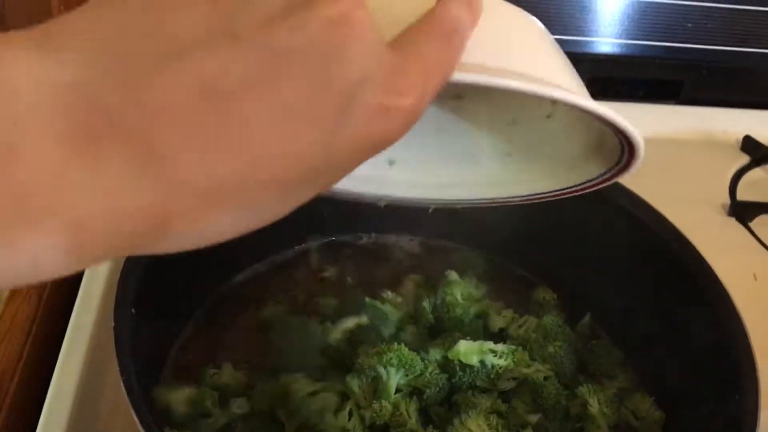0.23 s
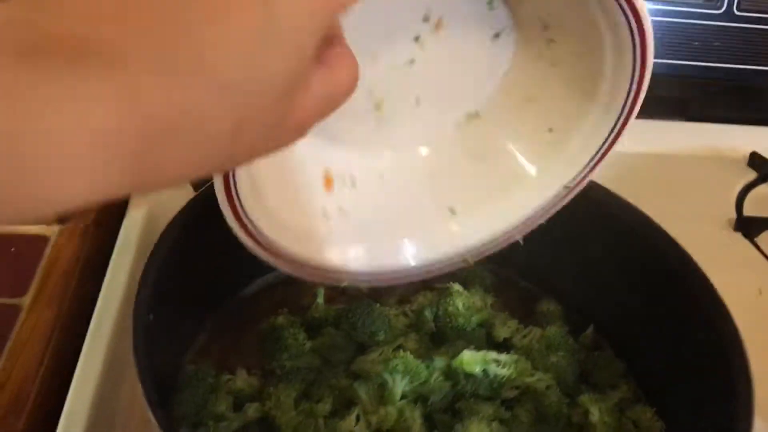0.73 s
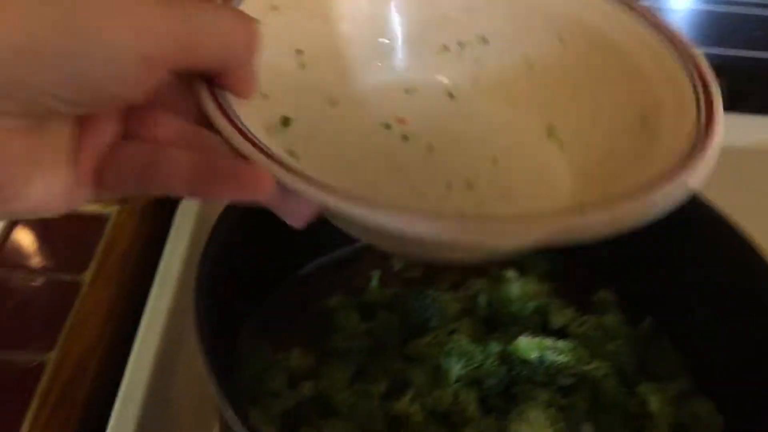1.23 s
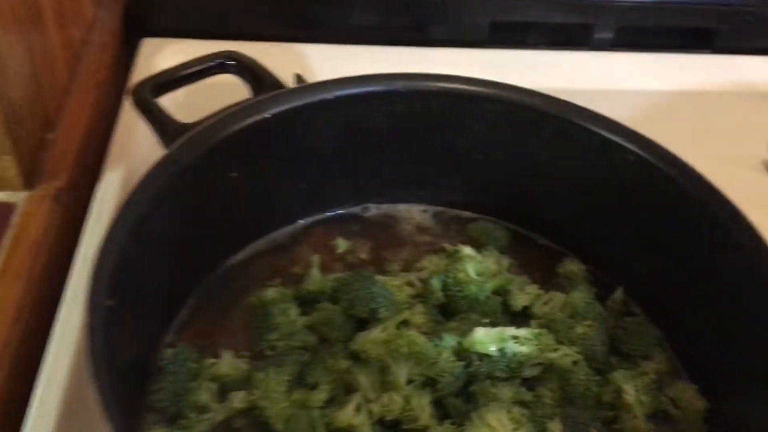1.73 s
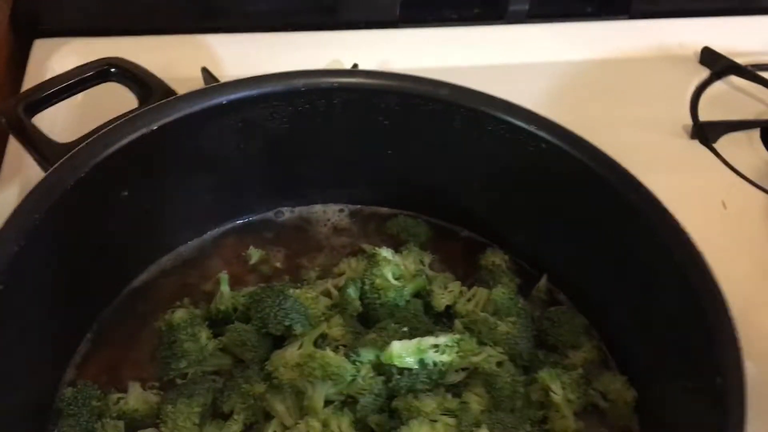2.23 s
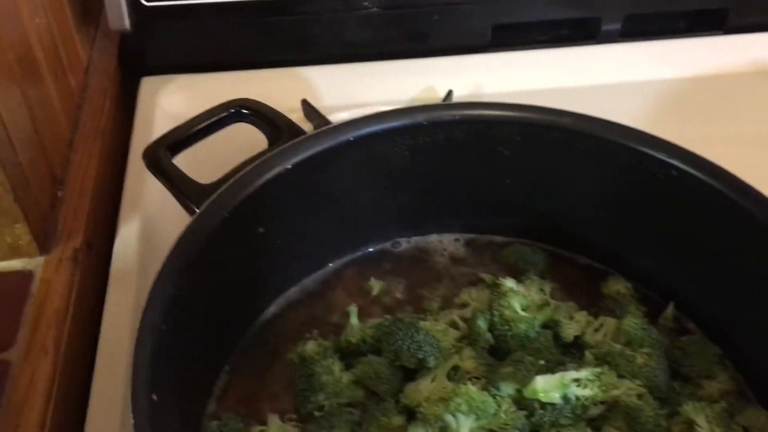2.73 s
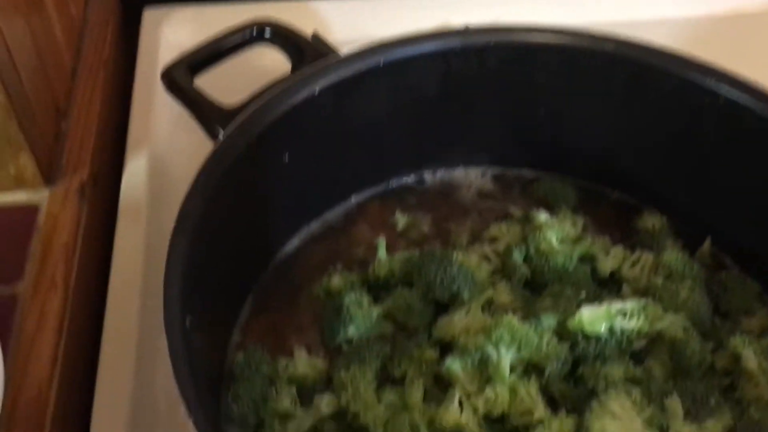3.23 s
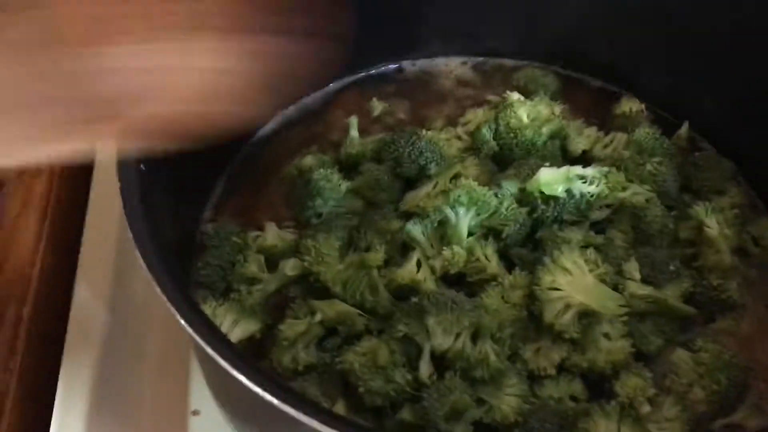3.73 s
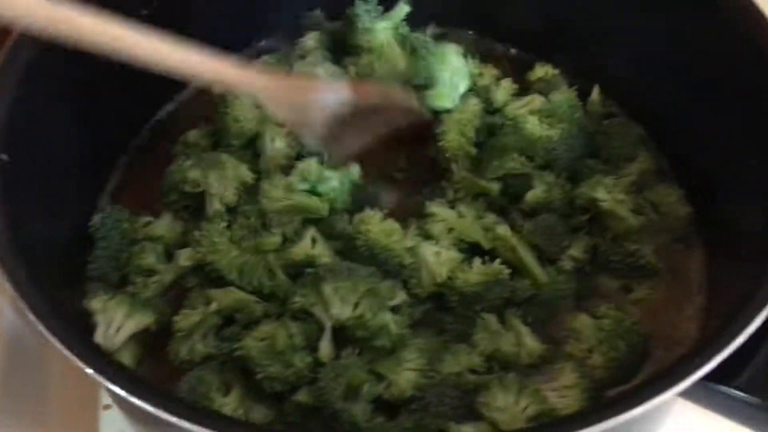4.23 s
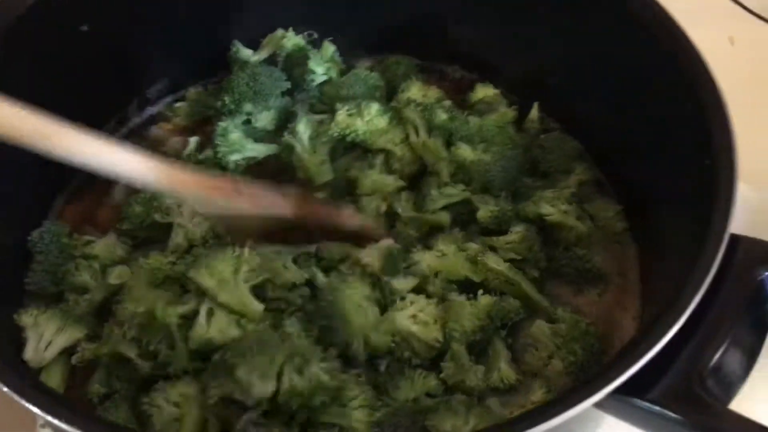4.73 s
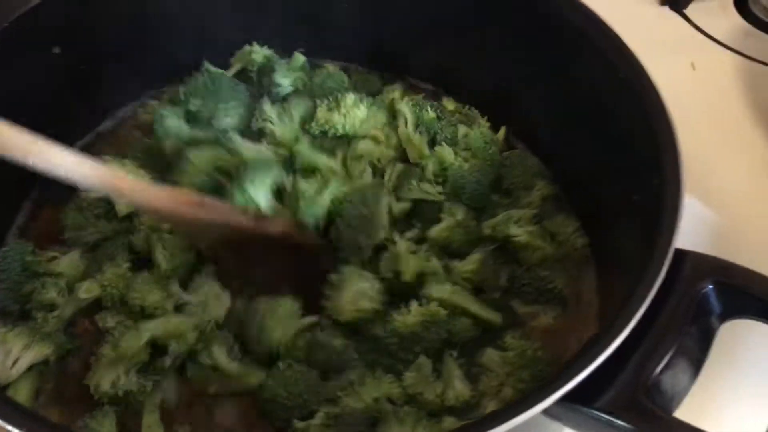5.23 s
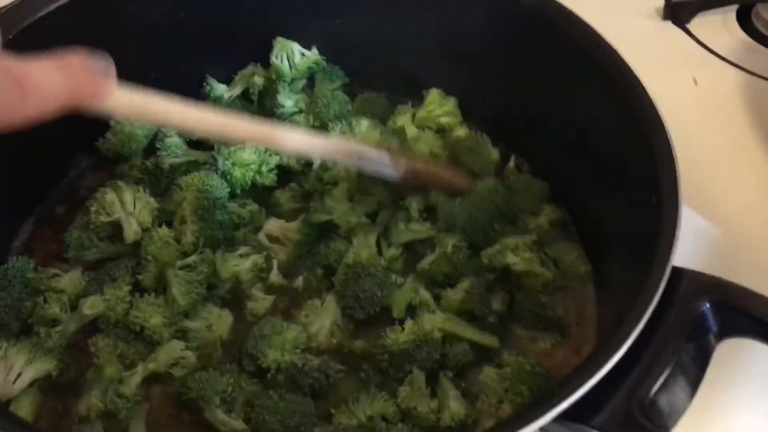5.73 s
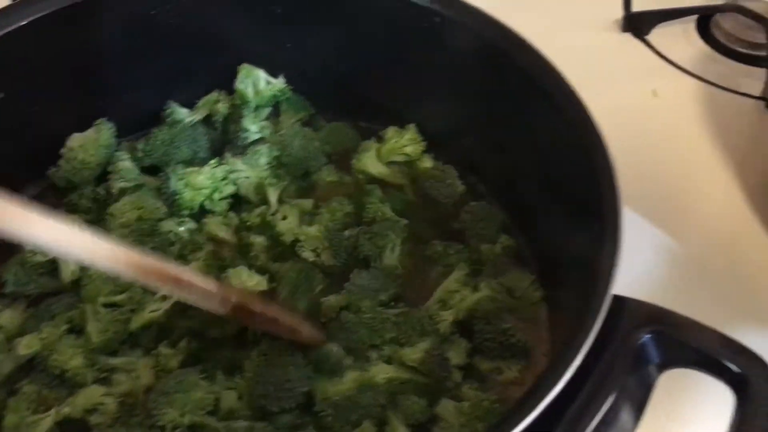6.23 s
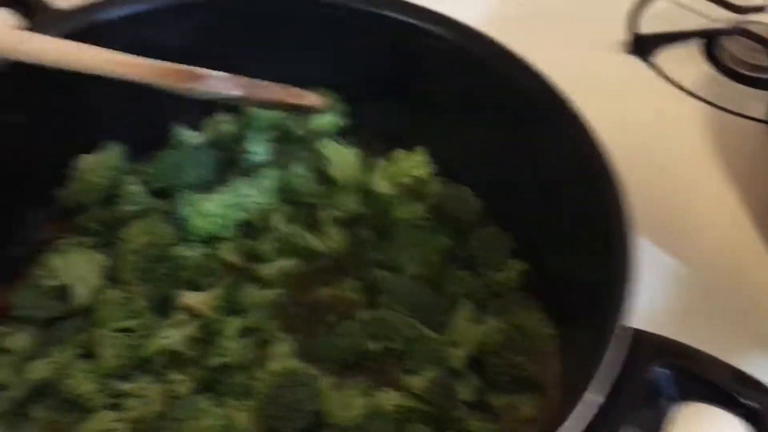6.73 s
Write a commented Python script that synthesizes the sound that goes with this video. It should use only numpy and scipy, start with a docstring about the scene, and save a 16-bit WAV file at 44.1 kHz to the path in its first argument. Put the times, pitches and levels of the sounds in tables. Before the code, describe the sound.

Close to a stove, wet vegetables settle in broth with a light, fading fizz over low appliance hum. After two seconds a heavy bowl bangs onto a counter, hard and bright, and rattles again before resting. A spoon knocks softly, then stirs in repeated strokes: moist crackling, small snaps, bubble pops and a low liquid wash. The indoor room answers briefly; the stirring is far quieter than the bowl.

```python
"""The last florets slide with a wet crackle from a ceramic bowl into a simmering soup pot, in a humming kitchen.
The bowl is set down hard nearby: it knocks, bounces and rattles to rest, as decaying modes and noise bursts.
A wooden spoon is picked up and stirs the florets: clouds of tiny damped sines crackle and squelch,
rising tones plop, short noise bursts snap, and low noise washes with each stroke."""
import sys
import numpy as np
from scipy import signal
from scipy.fft import rfft, irfft, next_fast_len
from scipy.io import wavfile
from scipy.ndimage import map_coordinates

SR = 44100
rng = np.random.default_rng(int(sys.argv[2]) if len(sys.argv) > 2 else 0)


def to_wav(sig):
    """Store sig (one row per channel, or 1-D mono) as 16-bit WAV at the path in sys.argv[1].

    Samples outside -1..1 are clipped; the rate is SR.
    """
    pcm = np.clip(np.atleast_2d(sig), -1, 1) * 32767
    pcm = np.round(pcm).astype(np.int16)
    wavfile.write(sys.argv[1], SR, pcm.T)  # frames by channels


N = 308259
TIME = np.arange(N) / SR  # s
RING_TIME = TIME[:SR // 2]  # the time axis of one blow, s

# Spectrum of the quiet kitchen air. Each row: frequency in Hz, relative level in dB per Hz.
AIR_SPECTRUM = [(13, -54), (22, -20.5), (49, -3.5), (72, 2), (91, -11), (123, 2), (148, -12.5), (234, -5),
                (434, -15.5), (470, -15.5), (615, -17.5), (997, -19.5), (2690, -29.5), (6200, -37),
                (13500, -40.5)]
# Hum of motors and mains. Each row: frequency in Hz, mean level in dB.
HUM_TONES = [(64, -74.5), (120, -74.5), (238, -77.5), (355, -77.5), (472, -84), (531, -85)]
# Reverberation of the room. Each row: frequency in Hz, t60 in s.
ROOM_DECAY = [(200, 0.63), (600, 0.27), (1400, 0.41), (4000, 0.41), (7000, 0.31), (13000, 0.28),
              (14500, 0.22)]

# Spectrum of the moving broth. Each row: frequency in Hz, relative level in dB per Hz.
BROTH_SPECTRUM = [(25, -1), (55, -3.5), (110, 5), (280, 7), (550, -6), (1100, -20), (2200, -15.5),
                  (4000, -24)]
# Spectrum of the wet crackle. Each row: frequency in Hz, relative level in dB per Hz.
WET_SPECTRUM = [(600, -10.5), (1100, 7.5), (1600, -13), (2200, -4), (4000, 1.5), (8000, 11.5), (10500, 8.5),
                (13500, 2)]
# Strokes of the spoon through the pot. Each row: start in seconds, length in s, wet crackle in dB,
# moving broth in dB.
STROKES = [(3.96, 0.3, -63.5, -58.5), (4.483, .37, -65, -57), (5.05, 0.51, -66, -67.5),
           (5.765, 0.3, -64.5, -63.5), (6.313, 0.4, -69.5, -61.5), (6.86, 0.25, -66, -67)]
STROKE_RISE_S = 0.018  # time constant as the florets start to move
SETTLE_T60_S = 1.66  # they settle again after the spoon stops
SURGE_SHARE = 0.57  # time constant of the broth's surge, as a share of the stroke's length
POUR_DB, POUR_T60_S = -67, 3.6  # the crackle of the freshly tipped florets dies away
POUR_WASH_DB, POUR_WASH_T60_S = -65, 2.7  # and so does the wave they raise in the broth
REST_DB = -83  # crackle of the florets lying in the hot broth

# Florets land or are pushed through the broth. Each row: start in seconds, level in dB, length in s,
# centre of the band in Hz.
SQUELCHES = [(0, -66.5, 0.06, 6540), (0.124, -63, .025, 7400), (0.237, -57.5, 0.0085, 8050),
             (3.975, -62, 0.022, 1200), (4.086, -53, 0.044, 2900), (4.104, -58, .09, 5640),
             (4.678, -56, 0.048, 2160), (4.822, -56, 0.039, 1700), (4.898, -66, .11, 1390),
             (5.105, -68, .15, 2600), (5.842, -64, 0.16, 2320), (6.579, -62, 0.04, 1420),
             (6.981, -57.5, .03, 3520)]
# Wet films snap between the florets. Each row: start in seconds, level in dB, centre in Hz.
SNAPS = [(4.872, -51, 2000), (5.3145, -48.5, 5800), (5.3375, -49, 5800), (5.464, -47.5, 3800),
         (5.518, -49, 4600), (5.5365, -44.5, 7900), (6.21, -53, 3700), (6.3312, -41, 2850),
         (6.7767, -52, 3600), (6.9118, -44.5, 3650)]
# Bubbles and pockets of air that pop. Each row: start in seconds, level in dB, initial pitch in Hz, t60 in s.
PLOPS = [(2.630, -39.5, 947, 0.032), (3.129, -49.5, 2170, 0.011), (4.900, -46, 980, 0.018),
         (4.994, -48.5, 2300, 0.011), (5.003, -46, 1070, 0.017), (5.055, -51, 570, 0.022),
         (5.374, -57, 1880, 0.018), (6.44, -52, 1940, 0.022), (6.4875, -37, 565, 0.022),
         (6.494, -51.5, 258, 0.22)]
# Soft swishes as the spoon is brought over the pot. Each row: peak in seconds, level in dB, half width in s.
SWISHES = [(3.65, -71, 0.055), (3.774, -62.5, 0.019)]
# The bowl is rubbed, by the sliding florets and then by the worktop. Each row: start in seconds,
# length in s, level in dB.
RUBS = [(0, 0.17, -77), (2.862, .05, -70)]
# Resonances of the rubbed bowl. Each row: frequency in Hz, relative level in dB.
RUB_MODES = [(3615, -3), (5600, -4.5), (8060, -4)]
# The spoon ticks against the pot. Each row: start in seconds, level in dB.
TICKS = [(4.427, -55.5), (4.4588, -48.5), (4.4622, -44), (5.589, -44)]
# Modes of the full pot. Each row: frequency in Hz, relative level in dB, t60 in s.
POT_MODES = [(2470, -11, 0.073), (3400, -19, 0.11), (4320, -5, 0.016), (6060, -13.5, 0.046),
             (6440, -2.5, 0.015)]
# Dull knocks of bowl and spoon being handled. Each row: start in seconds, knock in dB, centre in Hz,
# click in dB, boom in dB, t60 of knock and click in s.
KNOCKS = [(1.4525, -49, 830, -59.5, -60, 0.097), (3.2008, -56, 910, -44.5, -45, 0.016),
          (3.203, -38.5, 750, -59.5, -43.5, 0.044), (3.214, -57.5, 600, -62, -47, 0.1),
          (3.4042, -42.5, 950, -72, -49, 0.028), (3.4206, -60.5, 1200, -57, -70, 0.025),
          (4.689, -55, 414, -72, -50.5, 0.05), (5.575, -52, 526, -57.5, -51.5, 0.15),
          (5.635, -58, 474, -80, -60, .15), (6.674, -61, 600, -62, -55, 0.052)]

# The bowl meets the worktop. Each row: start in seconds, knock in dB, ceramic ring in dB, crack in dB,
# knock tilt in dB per octave, how far it is seated on its foot from 0 to 1.
BOWL_CONTACTS = [(2.4001, -15.5, -15.5, -25.5, 11, 0.11), (2.4029, -19, -31.5, -31, 2, 0.8),
                 (2.4314, -21, -28, -36.5, 3, 0.03), (2.4518, -26, -59, -52.5, 6.5, 0.5),
                 (2.6704, -21.5, -35, -38.5, -1.5, 0.6), (2.7181, -31.5, -35, -30, 8.5, 1),
                 (2.7223, -19.5, -28.5, -28, -1, 0.7), (2.7345, -16.5, -25, -31.5, -1.5, 1),
                 (2.7476, -18, -31.5, -28, -6.5, 0.7), (2.768, -28.5, -49, -42, 7, 1)]
# Modes of worktop and bowl together. Each row: frequency in Hz, relative level in dB, t60 in s.
WORKTOP_MODES = [(429, -3, .075), (513, -9, .06), (725, -6, .05), (888, -2, .06), (963, -2, .06),
                 (1118, -3, .055), (1188, -4, .055), (1362, 0, .06), (1402, -2, .06), (1525, 0, .05),
                 (1620, -2, .05), (1820, -3, .05), (1990, -2, .045), (2240, -6, .045)]
# Modes of the ceramic wall, off its foot. Each row: frequency in Hz, relative level in dB, t60 in s.
CERAMIC_MODES = [(2720, -21, .08), (3600, -19, .07), (3860, -16, .05), (4080, -11, .14), (4135, -8, .07),
                 (4190, -12, .08), (6436, 0, .055), (7635, -21, .06), (8130, -13, .07), (9008, -24, .09),
                 (10095, -22, .09), (10385, -29, .1), (12700, -31, .05), (13000, -32, .05)]
# Noise of the bowl's thud. Each row: frequency in Hz, relative level in dB per Hz.
THUD_SPECTRUM = [(60, -23), (200, -19), (400, -7.5), (900, 7), (1900, 3), (2900, -14), (5000, -37),
                 (9000, -48.5), (14000, -64)]
# Noise of a sharp contact. Each row: frequency in Hz, relative level in dB per Hz.
CRACK_SPECTRUM = [(300, -14.5), (1500, -1), (4300, 5), (5400, -5), (8100, -1.5), (9400, -9.5),
                  (10200, -15.5), (11600, -17), (13100, -16), (14300, -20.5)]

QUIET_TOP_HZ = 13650  # upper limit of all sounds but the bowl's blows
TOP_HZ = 15200  # upper limit of the whole


def amp(db):
    """The decibel law: twenty decibels are a tenfold amplitude."""
    return 10 ** (np.asarray(db) / 20)


def unit(x):
    """Normalization of power: scale to rms 1."""
    return x / np.sqrt(np.mean(x ** 2) + 1e-20)


def along(points, hz):
    """Interpolation on a logarithmic frequency axis through (Hz, value) points."""
    point_hz, values = np.transpose(points)
    return np.interp(np.log(hz + 1), np.log(point_hz), values)


def wobble(rate):
    """Slow fluctuation: a smooth curve through random knots, rate of them a second."""
    knots = rng.standard_normal(int(N * rate / SR) + 4)
    return map_coordinates(knots, [TIME * rate])


def since(s):
    """Elapsed time in seconds from time s, zero before it."""
    return np.maximum(TIME - s, 0)


def dying(s, t60):
    """Exponential decay: a gain of 1 that falls by 60 dB in t60 from time s on."""
    return np.exp(-np.log(1000) * since(s) / t60)


def filtered(x, gain):
    """Linear filtering: x times a gain that depends on frequency."""
    size = next_fast_len(len(x) + 8192)
    hz = np.fft.rfftfreq(size, 1 / SR)
    return irfft(rfft(x, size) * gain(hz), size)[:len(x)]


def coloured(x, spectrum):
    """Spectral shaping: x under a (Hz, dB) spectrum, at rms 1."""
    return unit(filtered(x, lambda hz: amp(along(spectrum, hz))))


def hump(x, centre_hz, octaves):
    """Band-pass: x through one smooth band, Gaussian in octaves, at rms 1."""
    return unit(filtered(x, lambda hz: np.exp(-.5 * (np.log2((hz + 1) / centre_hz) / octaves) ** 2)))


def hiss():
    """White noise, equal power at all frequencies, for half a second."""
    return rng.standard_normal(len(RING_TIME))


def fade(t60, attack):
    """Transient response: a quick rise, then exponential decay, as after a blow."""
    return np.exp(-np.log(1000) * RING_TIME / t60) * (1 - np.exp(-RING_TIME / attack))


def burst(noise, t60, attack):
    """Impact noise under the envelope of a blow, with the energy of that envelope."""
    envelope = fade(t60, attack)
    return unit(noise * envelope) * np.sqrt(np.mean(envelope ** 2))


def ring(modes, attack, tilt_db=0):
    """Modal superposition: decaying sines, with new strengths for each point of contact."""
    hz, db, t60 = np.transpose(modes)
    tilt = tilt_db * np.log2(hz / np.median(hz))
    strength = amp(db + rng.standard_normal(len(hz)) + tilt)
    phase = rng.random((len(hz), 1))  # turns
    waves = np.sin(2 * np.pi * (hz[:, None] * RING_TIME + phase))
    return strength @ (waves * fade(t60[:, None], attack)) / np.linalg.norm(amp(db))


def add(track, s, sound):
    """Superposition: mix a sound into a track at time s."""
    part = track[round(s * SR):][:len(sound)]
    part += sound[:len(part)]


def in_kitchen(x, room_db, build_up_s=0.0072):
    """Reverberation: the walls' answer builds up, then dies at its own speed in each band."""
    hz, t, bands = signal.stft(hiss(), SR, nperseg=256)
    decay = np.exp(-np.log(1000) * t / along(ROOM_DECAY, hz)[:, None])
    tail = signal.istft(bands * decay, SR, nperseg=256)[1][:len(RING_TIME)]
    tail = tail * (1 - np.exp(-(RING_TIME / build_up_s) ** 2))
    return x + amp(room_db) * signal.fftconvolve(x, tail / np.linalg.norm(tail))[:len(x)]


def in_pot(x):
    """Multiple reflection: the steep walls throw each small sound to and fro, which colours it."""
    walls = fade(t60=.04, attack=.001) * hiss()
    return x + amp(-10) * signal.fftconvolve(x, walls / np.linalg.norm(walls))[:len(x)]


def grains(count, centre_hz, spread, cycles, size_db):
    """Granular noise of tiny bursting films of broth: damped sines at random, a few much larger than the rest."""
    when, rank = rng.random((count, 2)).T
    hz = centre_hz * np.exp(spread * rng.standard_normal((count, 1)))
    hz = np.clip(hz, 300, SR / 3)
    steps = np.arange(200)  # samples in a grain
    turns = hz * steps / SR
    size = amp(-size_db * np.log(rank + .01))[:, None]
    waves = size * np.sin(2 * np.pi * turns) * np.exp(-turns / cycles)
    places = (when * N).astype(int)[:, None] + steps
    return unit(np.bincount(places.ravel(), waves.ravel(), N)[:N])


def background():
    """Stationary sources: a faint simmer of grains, appliance hum of wavering sines, room air of shaped noise."""
    simmer = amp(-86) * grains(count=260, centre_hz=7500, spread=.3, cycles=1.5, size_db=2.5)
    hum = np.zeros(N)
    for hz, db in HUM_TONES:
        tone = np.sqrt(2) * np.sin(2 * np.pi * hz * TIME + .5 * wobble(1.4))
        hum += amp(db + wobble(8.8)) * tone
    air = amp(-62.0 + 0.58 * wobble(4)) * coloured(rng.standard_normal(N), AIR_SPECTRUM)
    return simmer + hum + air


def motion():
    """Addition of powers: the pour dies away, florets move and settle at each stroke, broth surges at mid-stroke."""
    florets = amp(REST_DB) ** 2 + (amp(POUR_DB) * dying(0, POUR_T60_S)) ** 2
    broth = (amp(POUR_WASH_DB) * dying(0, POUR_WASH_T60_S)) ** 2
    for s, length, crackle_db, broth_db in STROKES:
        push = (1 - np.exp(-since(s) / STROKE_RISE_S)) * dying(s + length, SETTLE_T60_S)
        surge = np.exp(-np.abs(TIME - s - length / 2) / (SURGE_SHARE * length)) * (TIME > s)
        florets = florets + (amp(crackle_db) * push) ** 2
        broth = broth + (amp(broth_db) * surge) ** 2
    return np.sqrt(florets), np.sqrt(broth)


def stirring():
    """Bubble noise: moving wet florets crackle, trap air and froth, over the low wash of the broth."""
    fine = coloured(grains(count=6500, centre_hz=4200, spread=.8, cycles=.7, size_db=3.8), WET_SPECTRUM)
    pops = grains(count=900, centre_hz=7000, spread=.45, cycles=1.5, size_db=3.6)
    pockets = grains(count=1100, centre_hz=1900, spread=.4, cycles=2.5, size_db=3)
    fizz = grains(count=5000, centre_hz=12000, spread=.15, cycles=1.5, size_db=3)
    mush = hump(grains(count=9000, centre_hz=2500, spread=.6, cycles=1, size_db=3), 2500, octaves=.6)
    clumps = amp(wobble(35))  # florets catch and let go in clumps
    florets, broth = motion()
    crackle = florets * clumps * (amp(-5.5) * fine + amp(-13) * pops + amp(-12.0) * pockets)
    froth = florets * amp(.8 * wobble(20)) * (amp(-13.5) * fizz + amp(-13) * mush)
    wash = broth * amp(wobble(14)) * coloured(rng.standard_normal(N), BROTH_SPECTRUM)
    return in_kitchen(in_pot(crackle + froth), room_db=-7.0) + wash


def squelches():
    """Flow through narrow gaps: a push squeezes a rush of small bursts from between the florets."""
    out = np.zeros(N)
    froth = grains(count=16000, centre_hz=3360, spread=1.0, cycles=0.25, size_db=2.2)
    for s, db, length, hz in SQUELCHES:
        age = since(s) / (length / 4)  # the rush peaks at age 1
        out += amp(db) * age * np.exp(1 - age) * hump(froth, hz, octaves=1.08)
    return in_kitchen(out, room_db=-11)


def snaps():
    """Rupture of a liquid film: each break is one short tick of narrow-band noise."""
    out = np.zeros(N)
    for s, db, hz in SNAPS:
        tick = burst(hump(hiss(), hz, octaves=0.25), t60=0.0087, attack=0.001)
        add(out, s, amp(db) * tick)
    return in_kitchen(out, room_db=-10.0)


def plops():
    """Bubble resonance: the pitch rises as the bubble nears the surface, and a small splash joins it."""
    out = np.zeros(N)
    for s, db, hz, t60 in PLOPS:
        pitch = hz * (1 + 0.1 * np.minimum(RING_TIME / t60, 1))
        note = np.sin(2 * np.pi * np.cumsum(pitch) / SR) * fade(t60, attack=0.42 / hz)
        splash = burst(hump(hiss(), hz, octaves=0.39), t60, attack=0.00093)
        add(out, s, amp(db) * (note + amp(-5.5) * splash))
    return in_kitchen(out, room_db=-9.0)


def swishes():
    """Brushing noise: a light band of noise swells and fades as the arm reaches over."""
    swell = sum(amp(db) * np.exp(-.5 * ((TIME - s) / width) ** 2) for s, db, width in SWISHES)
    brushing = hump(rng.standard_normal(N), 5600, octaves=0.55)
    return in_kitchen(swell * brushing, room_db=-14.5)


def rubs():
    """Friction excitation: sliding feeds a few narrow resonances, so the bowl sings faintly."""
    feed = np.zeros(N)
    for s, length, db in RUBS:
        feed += amp(db) * (1 - np.exp(-since(s) / .01)) * dying(s + length, t60=0.24)
    song = sum(amp(db) * hump(rng.standard_normal(N), hz, octaves=.012) for hz, db in RUB_MODES)
    return feed * unit(song)


def pot_ticks():
    """Damped modes: the spoon touches the wall of the full pot, which rings only briefly."""
    out = np.zeros(N)
    for s, db in TICKS:
        scratch = burst(hump(hiss(), 6100, octaves=0.64), t60=0.0071, attack=0.00018)
        add(out, s, amp(db) * (ring(POT_MODES, attack=0.00025) + amp(-1.0) * scratch))
    return in_kitchen(out, room_db=-11)


def knocks():
    """Soft impact: a click, a damped knock and the low boom of what lies under it."""
    out = np.zeros(N)
    for s, db, hz, click_db, boom_db, t60 in KNOCKS:
        thump = burst(hump(hiss(), hz, octaves=0.76), t60, attack=0.00058)
        click = burst(coloured(hiss(), CRACK_SPECTRUM), t60, attack=0.00034)
        boom = burst(hump(hiss(), 237, octaves=0.86), 1.33 * t60, attack=0.0018)
        contact = amp(db) * thump + amp(click_db) * click + amp(boom_db) * boom
        add(out, s, in_kitchen(contact, room_db=-7.5))
    return out


def bowl():
    """Hard impact: each contact cracks, knocks the worktop and excites the modes of the ceramic."""
    out = np.zeros(N)
    hz, db, t60 = np.transpose(CERAMIC_MODES)
    for s, knock_db, ring_db, crack_db, tilt_db, seated in BOWL_CONTACTS:
        thud = burst(coloured(hiss(), THUD_SPECTRUM), t60=0.054, attack=0.0017)
        boom = burst(hump(hiss(), 210, octaves=.7), t60=0.082, attack=0.0038)  # the cupboard under the worktop
        knock = ring(WORKTOP_MODES, attack=0.001, tilt_db=tilt_db) + amp(0.5) * thud + amp(-27.5) * boom
        crack = burst(coloured(hiss(), CRACK_SPECTRUM), t60=.025, attack=0.0003)
        blow = amp(knock_db) * knock + amp(crack_db) * crack
        add(out, s, in_kitchen(blow, room_db=-10.5, build_up_s=0.004))
        # on its foot the bowl is stiffer and more damped, and the hard foot stirs the high modes
        modes = np.transpose([hz + 120 * seated, db, t60 / (1 + 1.2 * seated)])
        wall = ring(modes, attack=0.0006, tilt_db=7.2 * seated)
        add(out, s, in_kitchen(amp(ring_db) * wall, room_db=-10.5, build_up_s=.005))
    return out


def scene():
    """Superposition of sources: the quiet sounds are cut at a lower limit than the hard blows of the bowl."""
    quiet = background() + stirring() + squelches() + snaps() + plops()
    quiet = quiet + swishes() + rubs() + pot_ticks() + knocks()
    return (filtered(quiet, lambda hz: hz < QUIET_TOP_HZ) + bowl())[None]


def record(dry):
    """Band limitation: the microphone keeps almost nothing above its limit, by a steep low-pass."""
    low_pass = signal.ellip(10, .1, 90, TOP_HZ, fs=SR, output="sos")
    return signal.sosfilt(low_pass, dry)


dry = scene()
out = record(dry)
to_wav(out)
```